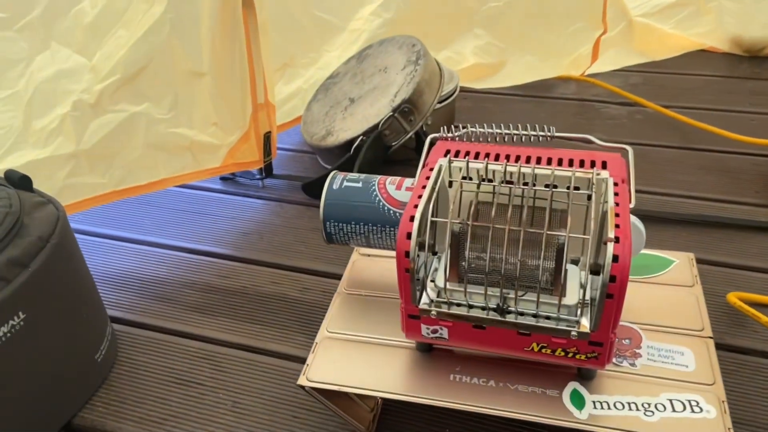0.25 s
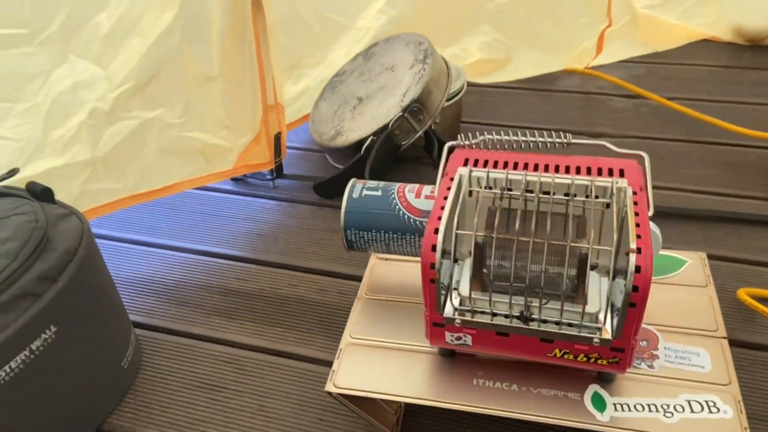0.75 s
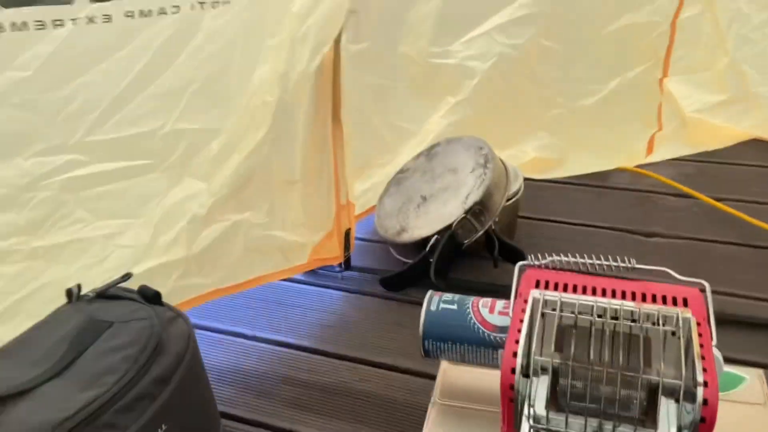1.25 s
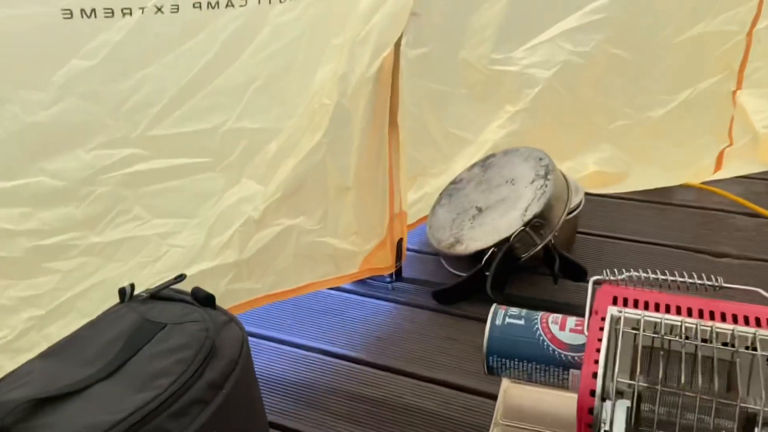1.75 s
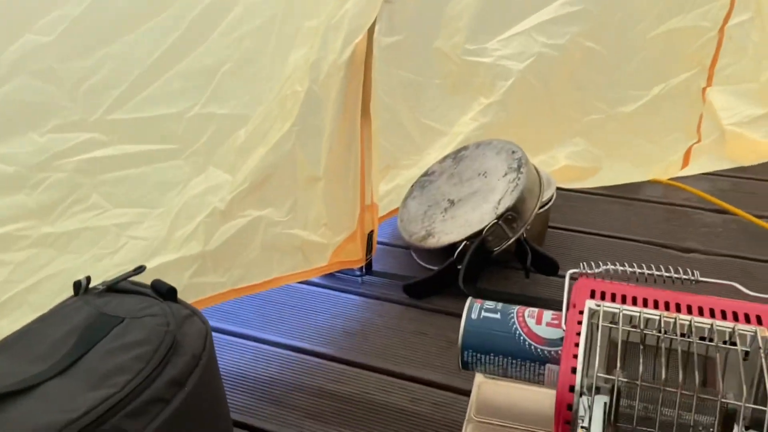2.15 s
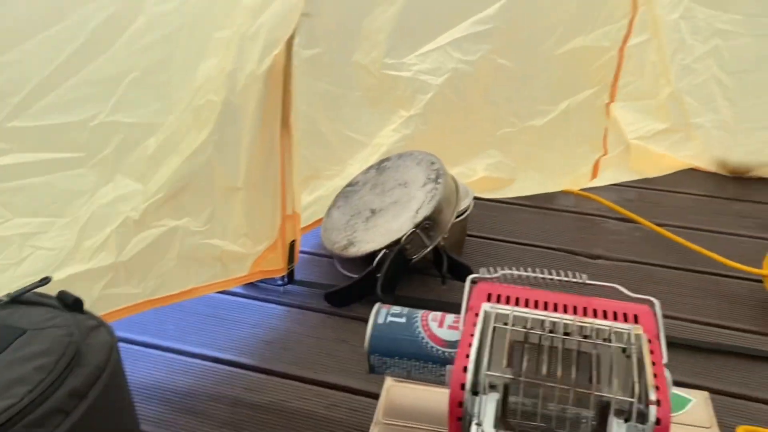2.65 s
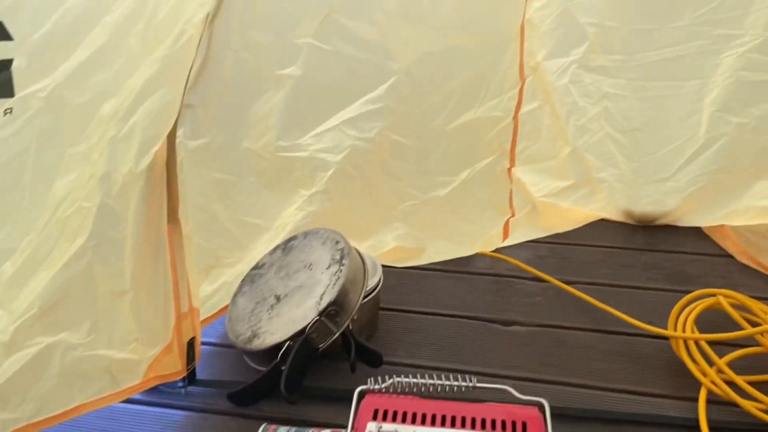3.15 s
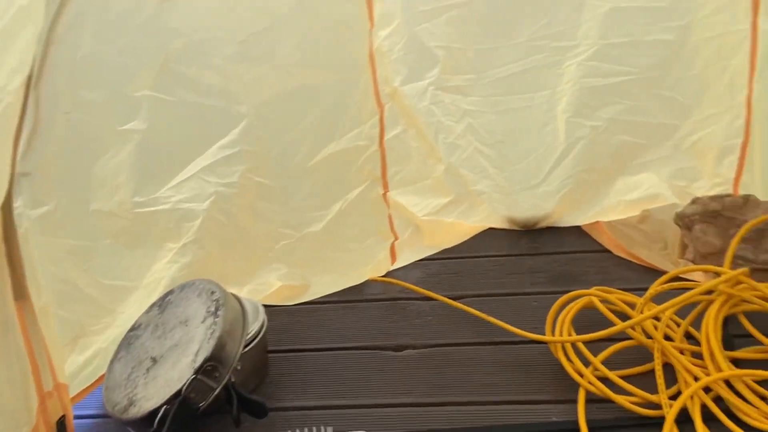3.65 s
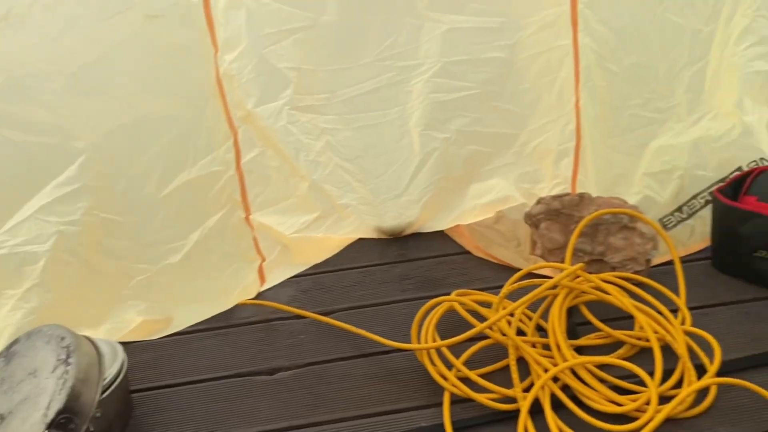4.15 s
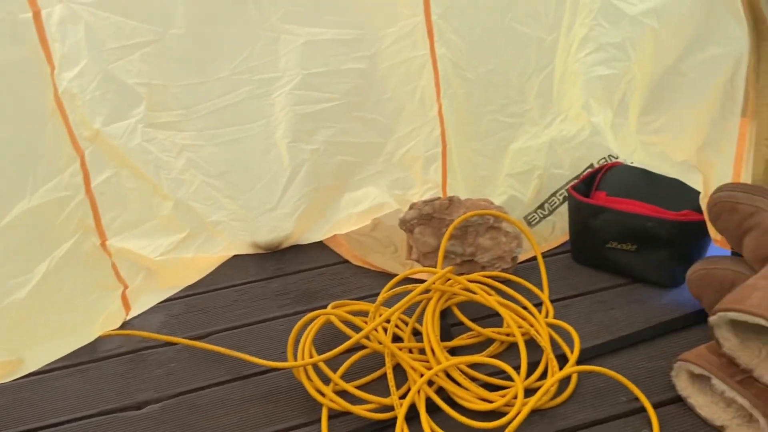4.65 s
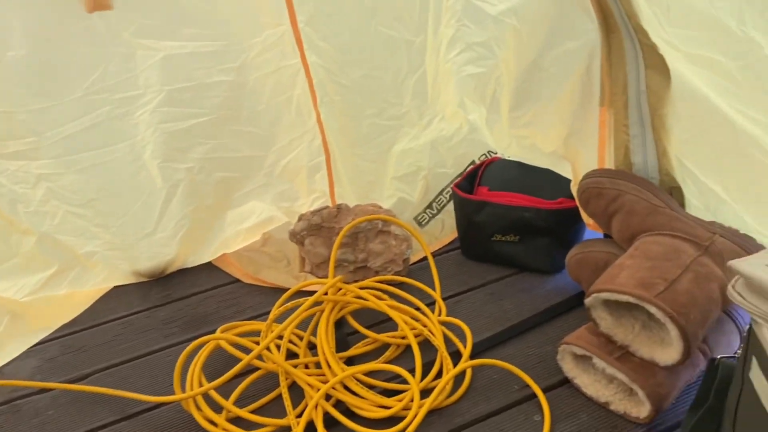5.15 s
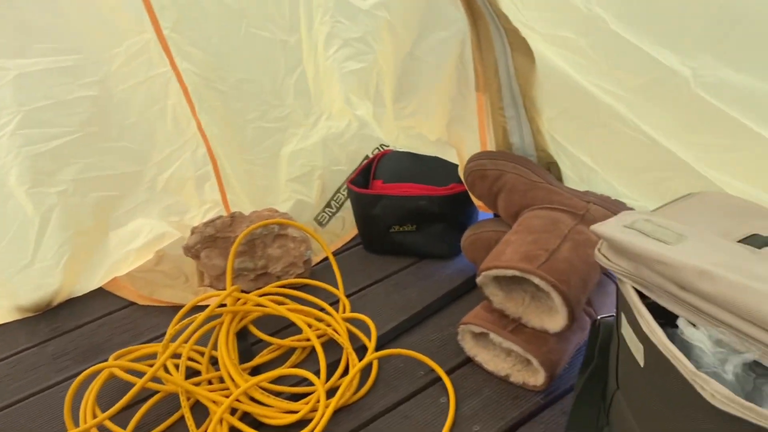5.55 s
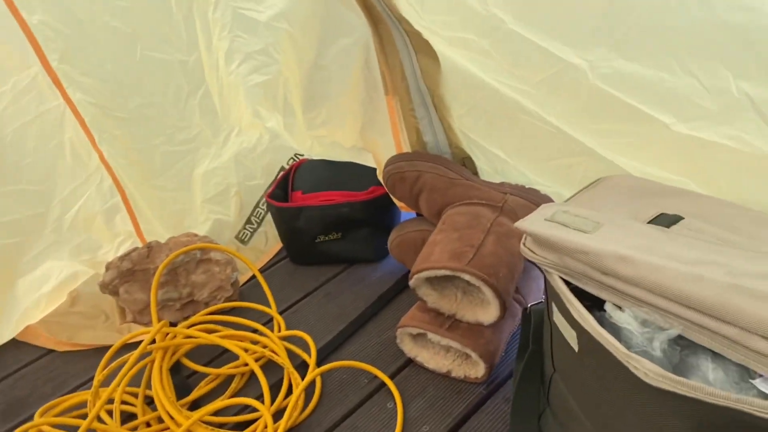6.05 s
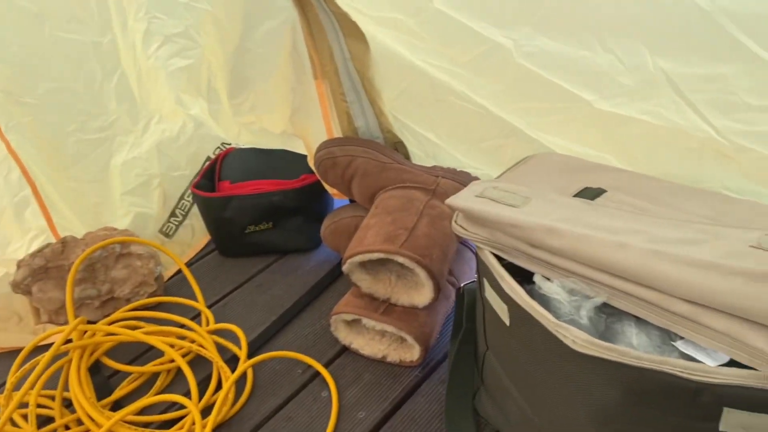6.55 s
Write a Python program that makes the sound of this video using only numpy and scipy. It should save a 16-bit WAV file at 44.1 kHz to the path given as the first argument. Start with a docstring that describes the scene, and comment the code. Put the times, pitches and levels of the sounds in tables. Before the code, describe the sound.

Crinkly coated nylon rustles and slides as someone shifts in a tent, with soft deck thumps and fold snaps, then settles to near quiet over a low rumble.

```python
"""Inside a tent, from the start: a far rumble and faint air (shaped noise), sliding nylon (patchy, grainy noise)
and a thin tone (unsteady sine). Soon folds snap (resonant ticks), the wooden deck thumps (ringing boards),
a bird whistles outside (gliding sines) and coating squeaks (narrow noise); slides swell in strokes.
From 2 s cloth scuffs (resonant noise swells); near 4.7 s a faint, very high whistle arches (sine); near 6.3 s
a faint, distant bird-like call (narrow noise). The tent answers near sounds; a phone microphone pair listens."""
import sys
import numpy as np
from scipy import signal
from scipy.fft import rfft, irfft, next_fast_len
from scipy.io import wavfile
from scipy.ndimage import uniform_filter1d, map_coordinates

SR = 44100
rng = np.random.default_rng(int(sys.argv[2]) if len(sys.argv) > 2 else 0)


def pcm_store(signal):
    """Save signal as 16-bit PCM."""
    levels = np.round(np.clip(np.atleast_2d(signal), -1, 1) * 32767)
    wavfile.write(sys.argv[1], SR, levels.astype(np.int16).T)


def attenuation_scalar(level_db):
    """Turn a level in dB into a linear amplitude multiplier (20 dB per decade)."""
    decades = np.asarray(level_db, float) / 20
    return 10 ** decades


N = 299880


def unit(x):
    """Scaled to rms 1."""
    return x / np.sqrt(np.mean(x ** 2) + 1e-20)


def along(points, hz):
    """(f/Hz, value) points interpolated on a log frequency axis."""
    f, v = np.transpose(points)
    return np.interp(np.log(hz + 1), np.log(f + 1), v)


def curves(rows):
    """One value per sample for each column after the time."""
    s, *cols = np.transpose(rows)
    return [np.interp(np.arange(N) / SR, s, c) for c in cols]


def wobble(knots_per_s):
    """Smooth random curve through normal knots, at most 40 a second."""
    knots = rng.standard_normal(int(N * 40 / SR) + 4)
    return map_coordinates(knots, [np.arange(N) * min(knots_per_s, 40) / SR])


def filtered(x, response):
    """x times a complex response of frequency."""
    m = next_fast_len(x.shape[-1] + 8192)
    return irfft(rfft(x, m) * response(np.fft.rfftfreq(m, 1 / SR)), m)[..., :x.shape[-1]]


def resonance(hz, centre_hz, width_hz):
    """Response of one causal resonance."""
    return 1j * hz * width_hz / (centre_hz ** 2 - hz ** 2 + 1j * hz * width_hz)


def roughened(noise, grain_db, size):
    """Noise with its level jittered by smoothed noise, so it crackles."""
    grain = unit(uniform_filter1d(rng.standard_normal(noise.shape[-1]), size=size))
    return noise * attenuation_scalar(grain_db * grain)


def lay(out, sound, start):
    """Adds sound from sample start, cut at the end of out."""
    part = out[..., start:start + sound.shape[-1]]
    part += sound[..., :part.shape[-1]]


# left-right likeness: f/Hz, correlation
LIKENESS = [(60, 0.93), (130, 0.8), (290, 0.48), (600, -0.24), (1400, -0.14), (3000, -0.09), (4500, 0.72),
            (6000, -0.53)]


def rush(spectrum, patchy_db, grain_db=0):
    """Stereo noise of rms 1 in random time-frequency patches; grain makes it crackle."""
    raw = roughened(rng.standard_normal((2, N)), grain_db, size=60)
    z = signal.stft(raw, nperseg=512)[2]
    field = uniform_filter1d(rng.standard_normal(z.shape[1:]), size=7, axis=0)
    field = uniform_filter1d(field, size=8, axis=1)
    pair = signal.istft(z * attenuation_scalar(patchy_db * unit(field)), nperseg=512)[1][:, :N]

    def mid_side(hz):
        turn = np.arccos(np.clip(along(LIKENESS, hz), -1, 1)) / 2
        return attenuation_scalar(along(spectrum, hz)) * [np.cos(turn), np.sin(turn)]

    mid, side = filtered(pair, mid_side)
    return unit(np.array([mid + side, mid - side]))


# far rumble: t/s, level/dB
RUMBLE_LEVEL = [(0, -50), (1, -51), (1.9, -52), (3.2, -49), (3.6, -51), (4.7, -51), (5.2, -51),
                (5.8, -50.5), (6.8, -51)]
# rumble and air spectra: f/Hz, density/dB per Hz
RUMBLE_SPECTRUM = [(16, -44.5), (28, -11.5), (70, -3), (103, -10.5), (134, -10.5), (155, -16.5),
                   (340, -31.5), (377, -33.5), (900, -49), (1170, -68), (1980, -120)]
AIR_SPECTRUM = [(500, -48.5), (800, -7), (2400, 5), (4600, -28), (7500, -6), (11000, -5), (15000, -26.5)]


def background():
    """Far low rumble and faint camp air: shaped noise."""
    level_db = curves(RUMBLE_LEVEL)[0] + 0.42 * wobble(7)
    rumble = attenuation_scalar(level_db) * rush(RUMBLE_SPECTRUM, patchy_db=1.3)
    air = attenuation_scalar(-85.5) * rush(AIR_SPECTRUM, patchy_db=8.5)
    return rumble + air


# constant stirring: t/s, hiss level/dB, fold body level/dB
STIRRING = [(0, -52.5, -54.5), (.09, -60, -58), (.4, -60, -59), (.66, -57.5, -55), (.92, -58, -50.5),
            (1.3, -59, -50.5), (1.52, -51.5, -52), (1.83, -60, -46), (1.87, -63, -58), (2.15, -68, -71),
            (2.6, -68.5, -67), (2.95, -63, -64), (3.3, -69.5, -72), (3.62, -73.5, -81.5), (4.1, -79, -78),
            (5.12, -82.5, -83), (5.65, -88.5, -78.5), (5.75, -78, -67.5), (5.97, -81, -68),
            (6.1, -80, -82.5), (6.8, -85, -75.5)]
# coating hiss and fold body spectra: f/Hz, density/dB per Hz
HISS_SPECTRUM = [(700, -24), (1300, -1.5), (2200, 5), (3500, -1.5), (5500, -0.5), (8000, -6),
                 (11000, -10.5), (16000, -9.5)]
BODY_SPECTRUM = [(150, 2.5), (300, -6.5), (500, -3.5), (900, -7.5), (1400, -11), (2500, -32)]


def rustle():
    """Coated nylon slides: grainy hiss, brighter when pushed harder, crease ticks and duller fold body."""
    stir_db, body_db = curves(STIRRING)
    hiss_db = 10 * np.log10(attenuation_scalar(stir_db) ** 2 + strokes())
    stir = wobble(14)
    hiss = rush(HISS_SPECTRUM, patchy_db=1.6, grain_db=1.9)
    # the coating's top octave grows faster than the rest
    sheen = filtered(hiss, lambda hz: np.clip((hz - 7000) / 3000, 0, 1))
    hiss = hiss + (attenuation_scalar(0.16 * (hiss_db + 77.5)) - 1) * sheen
    # hard slides lose part of the hump that light stirring has
    hump = filtered(hiss, lambda hz: resonance(hz, 2120, 830))
    hiss = hiss - np.clip((hiss_db + 56) / 35, 0, .5) * hump
    # about 220 creases a second
    creases = (rng.random(N) < 220 / SR) * rng.random(N) * rng.uniform(-1, 1, size=(2, N))
    ticks = unit(filtered(creases, lambda hz: resonance(hz, 860, 1200) ** 2))
    body = rush(BODY_SPECTRUM, patchy_db=-1.0, grain_db=0.5)
    body = attenuation_scalar(body_db + 2.0 * stir + 1.5 * wobble(25.11)) * body
    slide = attenuation_scalar(hiss_db) * (attenuation_scalar(0.31 * stir) * hiss + attenuation_scalar(-17) * ticks)
    return slide + attenuation_scalar(body_db - 15.5) * ticks + body


# thin tone that comes and goes: t/s, level/dB
TONE_LEVEL = [(0, -78), (4.1, -86.5), (4.7, -81.5), (4.9, -105), (5.3, -91.5), (5.45, -80), (6.2, -82),
              (6.75, -76.5), (6.8, -99)]


def tone():
    """Thin steady sine, slightly unsteady in phase and strength, offset in phase between the sides."""
    tone_hz = 2373
    phase = 2 * np.pi * tone_hz * np.arange(N) / SR + 0.7 * wobble(5.7)
    level_db = curves(TONE_LEVEL)[0] + 0.81 * wobble(17)
    return attenuation_scalar(level_db) * np.array([np.sin(phase), np.sin(phase + 0.59)])


# folds that snap: t/s, peak level/dB, f/Hz
FOLD_SNAPS = [(0.125, -47, 1040), (0.236, -47, 830), (0.327, -34.5, 2020), (0.602, -37, 5070),
              (1.355, -31.5, 960), (1.379, -31.5, 930), (1.382, -36, 3000), (1.41, -40.5, 915),
              (1.593, -42, 800), (1.76, -31.5, 1000), (1.807, -54, 1010), (1.829, -39, 1060),
              (2.091, -43.5, 2250), (2.237, -48.5, 1000), (2.432, -41.5, 4000), (2.5, -45.5, 720),
              (2.547, -42, 5500), (2.687, -44, 1320), (2.728, -45.5, 636), (2.852, -47.5, 1020),
              (2.87, -54, 1110), (2.916, -47, 970), (3.02, -45.5, 1020), (3.901, -58, 1790),
              (4.222, -61, 1870), (4.719, -43, 2020), (5.578, -59.5, 5000), (5.72, -47.5, 2840),
              (5.909, -52.5, 1980), (5.969, -59, 1200), (6.613, -61, 1390), (6.764, -53.5, 1460)]


def snaps():
    """A crease lets go: one sharp tick at both ports, then milliseconds of looser crackle."""
    out, t = np.zeros((2, N)), np.arange(SR // 10) / SR
    for s, db, hz in FOLD_SNAPS:
        blow = 1.8 * attenuation_scalar(-60 * t / .0012)
        crackle = 0.71 * attenuation_scalar(-60 * t / 0.022) * rng.standard_normal((2, len(t)))

        def fold(f):
            return resonance(f, hz, 1.16 * hz) ** 2 + 0.35 * resonance(f, 2500, 4700) ** 2

        tick = filtered(blow + crackle, fold)
        lay(out, attenuation_scalar(db) * tick / abs(tick).max(), round(s * SR))
    return out


# tent answer: f/Hz, t60/s
TENT_DECAY = [(200, 0.056), (2000, 0.08), (10000, 0.031)]


def tent(x):
    """Noise tail of the tent's answer; each frequency dies at its own speed."""
    hz, t, z = signal.stft(rng.standard_normal((2, SR // 3)), SR, nperseg=256)
    decay = attenuation_scalar(-60 * t / along(TENT_DECAY, hz)[:, None])
    tail = signal.istft(z * decay, SR, nperseg=256)[1]
    late = np.pad(x, ((0, 0), (200, 0)))  # samples
    return signal.fftconvolve(late, tail / np.linalg.norm(tail[0]), axes=1)[:, :N]


# soft pushes on the deck: t/s, level/dB, push f/Hz
DECK_THUMPS = [(0.201, -34.5, 91), (.612, -35.5, 218), (1.127, -39.5, 400), (1.148, -34, 315),
               (1.222, -45, 397), (1.163, -22, 64), (1.218, -30, 70), (1.297, -37, 460), (1.31, -25, 68),
               (1.347, -24, 65), (1.381, -29, 520), (1.588, -35.5, 83.4), (1.704, -23, 119),
               (1.729, -35, 91.5), (3.25, -55, 400), (3.282, -46, 308), (3.305, -44.5, 332),
               (3.329, -49.5, 370), (3.5, -51, 336), (5.75, -41.5, 430), (5.759, -23, 69.6),
               (5.797, -50, 460), (5.828, -51, 430), (6.657, -45.5, 315)]
# ringing boards: f/Hz, t60/s
BOARDS = [(66, 0.1), (88, 0.085), (120, 0.07), (216, 0.16), (308, 0.049), (400, 0.052), (480, 0.035)]


def thumps():
    """Knees and hands land softly; each push rings boards near its pitch and rattles them loosely."""
    reach_octaves = 0.5  # how far from its pitch a push stirs a board
    out, t = np.zeros(N), np.arange(SR // 2) / SR
    for s, db, push_hz in DECK_THUMPS:
        for hz, t60_s in BOARDS:
            noise = rng.standard_normal(len(t))
            rattle = unit(filtered(noise, lambda f: resonance(f, 0.94 * hz, 0.4 * hz) ** 2))
            share = np.exp(-(np.log2(hz / push_hz) / reach_octaves) ** 2)
            ring = (np.sin(2 * np.pi * hz * t) + 0.59 * rattle) * share
            soft_onset = 1 - np.exp(-t * hz / 1.6)
            lay(out, attenuation_scalar(db - 60 * t / t60_s) * soft_onset * ring, round(s * SR))
    return out


# whistled notes: start t/s, length/s, held f/Hz, droop/Hz, level/dB
BIRD_NOTES = [(.48, .105, 5080, 330, -65), (.735, .08, 5300, 480, -66), (2.61, .25, 4650, 110, -69),
              (2.92, .205, 4850, 210, -73), (3.13, .07, 4330, 350, -75), (3.31, .17, 5040, 300, -74),
              (3.62, .12, 4900, 170, -77), (3.715, .05, 4550, 330, -80), (5.6, .185, 4520, 240, -69),
              (5.8, .04, 4330, 60, -77), (5.91, .12, 4570, 280, -68), (6.025, .045, 4000, 480, -78)]


def bird():
    """Pure notes that scoop up, hold and droop at the end, wavering in pitch and strength."""
    scoop_hz, scoop_share, droop_power = 170, .2, 2.2
    out, waver = np.zeros(N), 1 + .005 * wobble(35)
    for start, length, held_hz, droop_hz, db in BIRD_NOTES:
        u = np.linspace(0, 1, round(length * SR))
        begin = round(start * SR)
        glide_hz = held_hz - scoop_hz * np.exp(-u / scoop_share) - droop_hz * u ** droop_power
        hz = glide_hz * waver[begin:][:len(u)]
        swell = np.sin(np.pi * u ** .9) ** .4
        lay(out, attenuation_scalar(db) * swell * np.sin(2 * np.pi * np.cumsum(hz) / SR), begin)
    return out * attenuation_scalar(3.5 * wobble(40))


# coating squeaks, and near 6.3 s a bird-like call: centre t/s, length/s, level/dB, f/Hz
NARROW_BANDS = [(0.628, 0.076, -61, 1390), (0.929, 0.061, -56, 1750), (0.95, 0.065, -62, 4550),
                (0.993, 0.029, -62, 2430), (3.412, 0.096, -69, 4060), (0.936, 0.1, -57, 940),
                (2.377, .04, -70, 5240), (6.267, 0.036, -76.5, 1720), (6.309, 0.06, -79, 2680),
                (6.322, 0.021, -74, 1780), (6.325, 0.05, -75, 1500)]


def squeaks_and_call():
    """Narrow noise bands that swell and fade: coating squeaks, and near 6.3 s a faint, distant bird-like call."""
    width_share, grain_db = .15, 2.5  # width as a share of the pitch
    out, t = np.zeros((2, N)), np.arange(-SR // 8, SR // 8) / SR
    for s, length, db, hz in NARROW_BANDS:
        rough = roughened(rng.standard_normal(len(t)), grain_db, size=200)
        band = unit(filtered(rough, lambda f: resonance(f, hz, width_share * hz) ** 2))
        swell = np.exp(-(2 * t / length) ** 2)
        lay(out, attenuation_scalar(db) * swell * band, round(s * SR) - SR // 8)
    return out


# single slides: peak t/s, rise/s, fall/s, hiss level/dB
SLIDES = [(.98, 0.11, 0.047, -49.5), (1.18, 0.25, 0.2, -45), (1.682, 0.17, 0.15, -40.5),
          (2.47, 0.14, 0.17, -63.5), (2.86, 0.11, 0.14, -64), (3.01, 0.041, 0.04, -59),
          (3.19, 0.079, 0.03, -66), (3.45, 0.17, 0.14, -67), (4.45, 0.05, 0.16, -66.5),
          (5.75, 0.07, 0.33, -76.5), (5.95, 0.42, 0.21, -68), (6.79, 0.028, .05, -77)]


def strokes():
    """Hiss power of the single slides: each swells to its peak and sinks again."""
    drop_db, roundness = 15, 1.62  # loss one rise or fall from the peak; shape of the top
    t, power = np.arange(N) / SR, np.zeros(N)
    for s, rise, fall, db in SLIDES:
        away = np.where(t < s, (s - t) / rise, (t - s) / fall)
        power += attenuation_scalar(db - drop_db * away ** roundness) ** 2
    return power


# cloth on cloth: centre t/s, length/s, level/dB, f/Hz
CLOTH_SCUFFS = [(2.001, 0.051, -59, 2020), (2.168, 0.05, -64, 1885), (2.219, 0.054, -64, 2020),
                (2.354, 0.061, -65.5, 2040), (2.434, .025, -64, 3300), (2.526, 0.07, -55, 1930),
                (2.694, 0.028, -54, 1960), (2.777, 0.042, -60.5, 2060), (2.835, 0.027, -51.5, 2080),
                (2.976, 0.18, -66, 3900), (2.986, 0.049, -56, 2130), (3.122, 0.044, -60.5, 2070),
                (3.18, 0.022, -51, 2240), (3.415, 0.078, -70, 4170), (3.432, 0.079, -57, 1890),
                (4.466, 0.092, -58.5, 2080), (4.82, 0.42, -75, 1520)]


def scuffs():
    """Cloth on cloth: a quick rough swell in a broad resonance."""
    out, t = np.zeros((2, N)), np.arange(-SR // 8, SR // 4) / SR
    for s, length, db, hz in CLOTH_SCUFFS:
        rough = roughened(rng.standard_normal((2, len(t))), 4.5, size=120)
        cloth = unit(filtered(rough, lambda f: resonance(f, hz, 1380) ** 2 + attenuation_scalar(-62.0) * (f > hz)))
        swell = np.where(t < 0, np.exp(-(t / (0.3 * length)) ** 2), np.exp(-t / (0.36 * length)))
        lay(out, attenuation_scalar(db) * swell * cloth, round(s * SR) - SR // 8)
    return out


# very high whistle: start t/s, length/s, end f/Hz, rise/Hz, level/dB
ARCH_WHISTLE = (4.72, .3, 11450, 1270, -88)


def arch():
    """One faint sine whose pitch climbs and falls back along a parabola."""
    start, length, end_hz, rise_hz, db = ARCH_WHISTLE
    u = np.clip((np.arange(N) / SR - start) / length, 0, 1)
    bow = 4 * u * (1 - u)
    phase = 2 * np.pi * np.cumsum(end_hz + rise_hz * bow) / SR
    return attenuation_scalar(db) * np.sqrt(bow) * np.sin(phase)


def scene():
    """Everything in and around the tent; whistles lean to the first channel."""
    whistles = (bird() + arch()) * attenuation_scalar([[1.5], [-1.5]])
    near = scuffs() + squeaks_and_call() + snaps() + whistles
    return near + attenuation_scalar(-5.0) * tent(near) + thumps() + rustle() + tone() + background()


def roll_off(x):
    """The treble ends steeply here."""
    return signal.sosfilt(signal.butter(12, 16060, fs=SR, output="sos"), x)


# left over right below the shared treble: f/Hz, level/dB
LEFT_LEAN = [(60, 1.6), (250, 3.5), (600, 1.7), (1300, 0.73), (4400, 3.9)]


def record(dry):
    """The phone's stereo: treble from one port, left side lagging; deepest bass cut."""
    top_hz = 15730

    def shared(hz):
        return np.clip((hz - 6000) / 900, 0, 1)

    def low_response(hz):
        lean = attenuation_scalar(np.array([[.5], [-.5]]) * along(LEFT_LEAN, hz))
        return np.sqrt(1 - shared(hz)) * lean / (1 + (36 / (hz + 1)) ** 4)

    def high_response(hz):
        turn = np.pi * (hz - 6950) / 4200
        return np.sqrt(shared(hz)) * (hz < top_hz) * np.exp(np.array([[-1j], [1j]]) * turn)

    low = filtered(dry, low_response)
    high = filtered(dry[0], high_response)
    return roll_off(low + high)


dry = scene()
out = record(dry)
pcm_store(out)
```